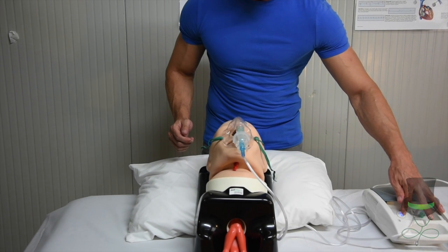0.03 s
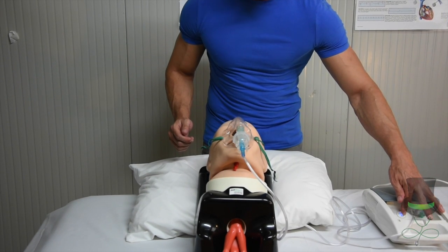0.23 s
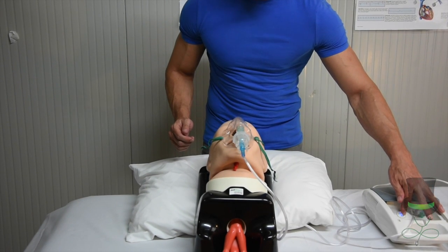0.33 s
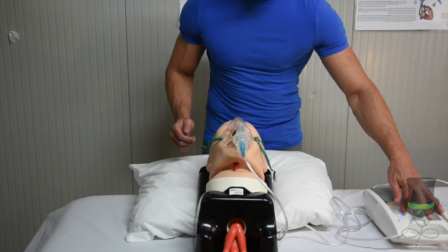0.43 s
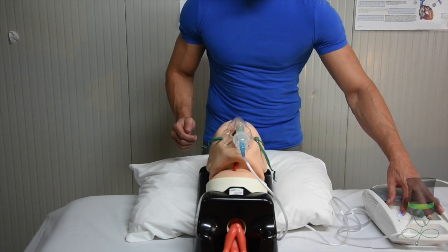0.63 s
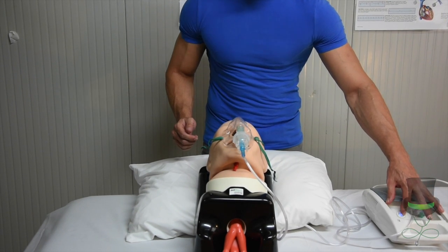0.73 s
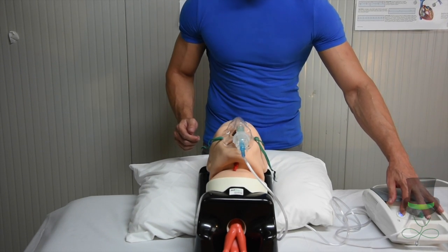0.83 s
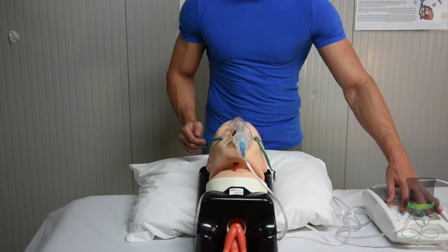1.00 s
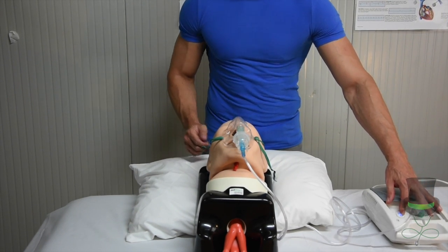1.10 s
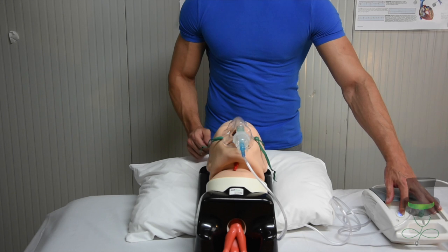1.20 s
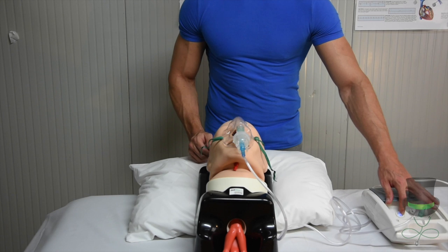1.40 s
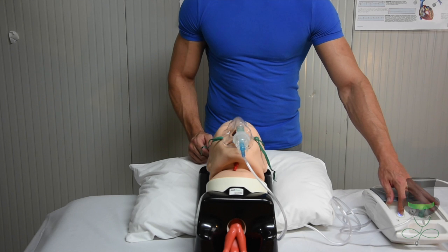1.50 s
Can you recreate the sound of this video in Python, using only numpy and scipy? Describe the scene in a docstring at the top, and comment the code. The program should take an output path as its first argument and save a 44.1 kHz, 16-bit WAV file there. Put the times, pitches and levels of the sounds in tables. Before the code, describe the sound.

A small air compressor starts up in a quiet room after the snap of a plastic switch. It knocks rapidly and rattles loosely, then steadies into a throbbing hum, while a hiss of air briefly whistles and grows brighter.

```python
"""A nebuliser's small piston compressor is switched on in a quiet room.
First the plastic rocker switch scrapes over and snaps, and a faint hum fades away. The piston then
knocks and throbs once a turn in its housing, rattling loosely at first, with a few thumps and bumps.
Air starts to hiss through the nozzle and briefly whistles. As the rattle settles and pressure builds,
the hiss brightens, and thin wavering tones and a valve tick come up."""
import sys
import numpy as np
from scipy import signal
from scipy.fft import rfft, irfft
from scipy.io import wavfile
from scipy.ndimage import uniform_filter1d

SR = 44100
rng = np.random.default_rng(int(sys.argv[2]) if len(sys.argv) > 2 else 0)


def waveform_to_disk(signal):
    """Save audio, clipped to [-1, 1], as 16-bit WAV at the path in sys.argv[1]."""
    frames = np.transpose(np.atleast_2d(signal))
    scaled = np.clip(frames, -1, 1) * 32767
    samples = np.round(scaled).astype(np.int16)
    wavfile.write(sys.argv[1], SR, samples)


N = 68355
T = np.arange(N) / SR
TURN_HZ, FIRST_KNOCK_S = 45.43, .2303
PUMP_PAN_DB, AIR_PAN_DB, SWITCH_PAN_DB = -3.5, -3, -1.2  # left against right


# Fader moves of the pump, before trims (time [s], knock [dB], throb [dB], body [dB])
PUMP_FADERS = [(0, -110, -110, -110), (.22, -85, -75, -86.5), (.245, -62.5, -72.5, -105),
               (.3, -63, -99, -78), (.328, -52, -64, -68), (.36, -45.5, -62, -61), (.39, -46, -65.5, -67),
               (.488, -55, -83, -63.5), (.494, -45, -73, -60.5), (.58, -46.5, -58.5, -60),
               (.65, -49, -53, -59.5), (.725, -45, -50, -55.5), (.79, -48, -54, -56.5),
               (.825, -45.5, -54, -60.5), (.87, -45.5, -52, -58), (.99, -46.5, -56.5, -60),
               (1.09, -47.5, -50, -59), (1.17, -48, -55, -60.5), (1.36, -48.5, -47, -58.5),
               (1.44, -48, -49, -57), (1.55, -48.5, -48.5, -61)]

def pump(knock_trim_db=-.5, throb_trim_db=.5, body_trim_db=4, tick_db=-74):
    """The compressor: knock, throb and body drone, with a valve tick that grows with the pressure."""
    knock = piston_knock() * amp(knock_trim_db + curve(PUMP_FADERS, 1))
    throb = chamber_throb() * amp(throb_trim_db + curve(PUMP_FADERS, 2))
    drone = body_drone() * amp(body_trim_db + curve(PUMP_FADERS, 3))
    tick = valve_tick() * amp(tick_db) * pressure()
    return place(knock + throb + drone + tick, PUMP_PAN_DB)


# Knocks that land harder or softer than the rest (time [s], gain [dB])
ACCENTS = [(.494, 1.5), (.539, -0.5), (.803, 2), (.825, 3.5), (.891, -2), (1.133, 1)]

def piston_knock(rattle_db=-4, settle_s=.65, settle_db_per_s=13, grit=.5):
    """The piston strikes the housing once a turn; a loose rattle between the blows slowly settles."""
    looseness = amp(rattle_db - settle_db_per_s * since(settle_s))
    return_stroke = strokes(.5, scatter_db=2, jitter_s=.0002)
    chatter = strokes(.33, scatter_db=3, jitter_s=.0004)
    rattle = unit(return_stroke + .6 * chatter + grit * noise())
    accent = amp(sum(db * (np.abs(T - at) < .5 / TURN_HZ) for at, db in ACCENTS))
    blows = accent * strokes(0, scatter_db=0, jitter_s=.00003)
    return housing(blows + looseness * rattle)


# Resonances of the housing (frequency [Hz], gain [dB])
HOUSING_EQ = [(100, -70), (600, -54.5), (700, -42), (772, -7.5), (818, -18), (863, -16.5), (940, -30),
              (1045, -8), (1090, -12), (1136, 0), (1181, 3.5), (1227, -6), (1272, 5), (1317, 2),
              (1363, -44), (1408, -10), (1550, -25), (2000, -61)]
# How late the housing answers (frequency [Hz], delay [s])
HOUSING_DELAY = [(1195, .0008), (1245, .0072)]

def housing(blows):
    """The housing colours each blow; its upper mode answers later, so a knock chirps."""
    hz = np.fft.rfftfreq(2 * N, 1 / SR)
    lag = np.exp(-2j * np.pi * np.cumsum(over_hz(HOUSING_DELAY, hz)) * hz[1])
    return unit(irfft(rfft(blows, 2 * N) * amp(over_hz(HOUSING_EQ, hz)) * lag)[:N])


# Hollow resonance of the air chamber (frequency [Hz], gain [dB])
CHAMBER_EQ = [(100, -69.5), (300, -49.5), (410, -28), (455, -11.5), (500, -9), (545, 1.5), (590, -5.5),
              (636, -19.5), (800, -45.5)]

def chamber_throb():
    """Each stroke pushes on the air chamber just over half a turn after the knock."""
    push = strokes(.55, scatter_db=1.5, jitter_s=.00004) + .25 * noise()
    return ring(push, CHAMBER_EQ)


# Low, broad resonances of the pump body (frequency [Hz], gain [dB])
BODY_EQ = [(25, -39.5), (40, -25), (75, -33), (95, -1), (135, -8.5), (180, -4.5), (205, -7), (272, -2),
           (318, 1.5), (400, -6.5), (700, -4.5), (1000, -1.5), (1600, -12), (3000, -46.5)]

def body_drone():
    """The strokes shake the body into a rough, noisy hum."""
    return ring(strokes(.55, scatter_db=.5, jitter_s=.0001) + 1.73 * noise(), BODY_EQ)


def valve_tick(turn=.4, decay_s=.003):
    """The valve lets out one short, bright tick a turn."""
    since_tick = ((T - FIRST_KNOCK_S) * TURN_HZ - turn) % 1 / TURN_HZ
    burst = noise() * np.exp(-since_tick / decay_s)
    return ring(burst, [(1200, -41), (3100, -2), (4200, 0), (9000, 0)])


# Cues for the heavier strokes (time [s], level [dB])
THUMP_CUES = [(0.362, -43), (0.651, -43.5), (0.712, -47), (0.868, -43.5), (1.26, -44.5), (1.399, -43)]

def chamber_thumps(hz=536.5, half_width_s=.0059):
    """Now and then a heavier stroke makes the air chamber boom."""
    envelope = sum(amp(db) * swell(at, half_width_s) for at, db in THUMP_CUES)
    return place(envelope * np.sqrt(2) * sine(hz), PUMP_PAN_DB)


# Cues for the casing bumps (time [s], pitch [Hz], level [dB])
BUMP_CUES = [(.51, 170, -61.5), (.703, 110, -60.5), (.805, 100, -60)]

def casing_bumps(half_width_s=.02):
    """The casing settles with soft, dull bumps."""
    bumps = sum(amp(db) * swell(at, half_width_s) * np.sqrt(2) * sine(hz) for at, hz, db in BUMP_CUES)
    return place(bumps, PUMP_PAN_DB)


# Thin tones in the jet (pitch [Hz], bandwidth [Hz], level against the hiss [dB])
JET_PARTIALS = [(2285, 41, -9), (2843, 42, -12), (3106, 90, -11.5), (4320, 70, -39), (5220, 27, -14.5),
                (7450, 40, -13), (9140, 90, -17), (11520, 140, -13), (13720, 26, -9), (14200, 70, -13)]

def jet_tones(waver_db=4, waver_hz=22):
    """Narrow tones waver in the jet and grow with the pressure."""
    tones = sum(narrow(hz, width) * amp(db + waver_db * walk(waver_hz)) for hz, width, db in JET_PARTIALS)
    return tones * pressure()


# Colour of the nozzle hiss (frequency [Hz], gain [dB])
HISS_EQ = [(1000, -9), (1600, -2), (2050, -3), (2500, -0.5), (3100, 4.5), (3800, -2.5), (4300, 2),
           (4750, -5.5), (5500, 1.5), (6600, -8), (7300, 0), (7900, -3.5), (8400, -9), (9100, 9),
           (9800, -5.5), (10600, -1), (11100, -5.5), (11500, -14), (12300, -3), (13200, -13.5),
           (13800, 1.5), (14600, -2), (15000, -2), (15700, -4), (16000, -10)]
# Sharp peak of the whistle (frequency [Hz], gain [dB])
WHISTLE_EQ = [(7000, -45), (8100, -23), (8260, 8), (8330, 6.5), (8420, -13.5), (8600, -15), (10000, -62.5)]
# Air faders (time [s], hiss before trim [dB], tilt about 4 kHz [dB/octave], whistle [dB])
AIR_FADERS = [(0, -110, -0.5, -110), (.25, -74.5, -9, -96), (.31, -68, -11.5, -78.5),
              (.37, -55, -7.5, -75.5), (.44, -55.5, -4.5, -62.5), (.475, -55, -3.5, -60.5),
              (.52, -52.5, -3, -50), (.56, -52, -1.5, -53), (.67, -52, 0, -67), (.7, -52.5, 1, -44),
              (.73, -51, -2, -47.5), (.79, -54, 0.5, -62.5), (1.1, -56.5, 2.5, -60.5),
              (1.35, -55.5, -0.5, -67), (1.55, -58.5, 2.5, -64.5)]

def nozzle(hiss_trim_db=-2.5, low_spread=.14, high_spread=.79, whistle_spread=.25):
    """Air hisses through the nozzle, brightening and widest in the treble; a whistle comes and goes."""
    centres = 1000. * 2 ** np.arange(5)
    tilt_db = np.outer(np.log2(centres / 4000), curve(AIR_FADERS, 2))
    band_gains = amp(hiss_trim_db + curve(AIR_FADERS, 1) + tilt_db)
    def hiss():
        jet = jet_tones() + reflections(ring(noise(), HISS_EQ))
        return bands(jet, centres) * band_gains
    def whistle():
        return ring(noise(), WHISTLE_EQ) * amp(curve(AIR_FADERS, 3))
    spread = np.linspace(low_spread, high_spread, len(centres))
    mid = hiss().sum(axis=0) + whistle()
    side = spread ** 2 @ hiss() + whistle_spread * whistle()
    return place(mid, AIR_PAN_DB, side)


# Cues for the squeaks (time [s], pitch [Hz], level [dB])
SQUEAK_CUES = [(.39, 2840, -60), (.432, 4450, -57.5), (0.442, 2800, -54), (.587, 5240, -61),
               (1.02, 2280, -64.5), (1.14, 2236, -62), (1.335, 3170, -60), (1.5, 5200, -63)]

def jet_squeaks(half_width_s=.016, width_hz=120):
    """The jet catches on a tone for a moment."""
    squeaks = sum(narrow(hz, width_hz) * amp(db) * swell(at, half_width_s) for at, hz, db in SQUEAK_CUES)
    return place(squeaks, AIR_PAN_DB)


# Colour of the scraping plastic (frequency [Hz], gain [dB])
PLASTIC_EQ = [(200, -55.5), (600, -47), (950, -32.5), (1300, -41.5), (1650, -22.5), (2000, -8.5),
              (2500, -8), (2850, -0.5), (3400, -4), (4050, -0.5), (4600, -5), (5500, -8.5), (7000, -8),
              (8000, -8), (8600, -19.5), (9050, -22), (9800, -9), (11500, -16), (13000, -24), (14300, -20),
              (16000, -51)]
# Ring-out of the switch (frequency [Hz], time to fall 60 dB [s])
SWITCH_DECAY = [(1000, .25), (2000, 0.21), (3000, 0.52), (4200, 0.3), (6000, 0.18), (8000, 0.24),
                (11000, 0.15), (15000, 0.09)]
# Ringing modes of the switch housing (pitch [Hz], peak level before trim [dB])
SWITCH_PARTIALS = [(2762, -37.5), (2966, -42.5), (3063, -33), (3300, -50), (3865, -44), (4065, -33),
                   (4527, -36), (5679, -37.5), (7111, -37), (7560, -34.5), (9878, -45)]

def rocker_switch(press_s=.1035, snap_s=.133, mute_s=.19, scrape_db=-21, snap_db=-28, ring_trim_db=-.5):
    """A gritty plastic scrape swells to a snap, rings in the housing and is damped by the finger."""
    onset_db_per_s, press_db_per_s, mute_db_per_s = 4497.5, 392, 267
    attack_db = -onset_db_per_s * np.maximum(press_s - T, 0) - press_db_per_s * np.maximum(snap_s - T, 0)
    finger = amp(attack_db - mute_db_per_s * since(mute_s))
    snap = amp(snap_db) * swell(snap_s, half_width_s=.0015)
    centres, t60s = np.array(SWITCH_DECAY).T
    def envelope(t60):
        return finger * amp(-60 * since(snap_s) / t60)
    def scrape(grain_db=2):
        grit = noise() * amp(grain_db * unit(uniform_filter1d(noise(), size=40)))
        band_gains = np.array([snap + amp(scrape_db) * envelope(t60) for t60 in t60s])
        return bands(ring(grit, PLASTIC_EQ), centres) * band_gains
    modes = sum(envelope(over_hz(SWITCH_DECAY, hz)) * amp(db + ring_trim_db) * sine(hz)
                for hz, db in SWITCH_PARTIALS)
    spread = over_hz([(4000, .2), (11000, .65)], centres)  # wider in the treble
    return place(scrape().sum(axis=0) + modes, SWITCH_PAN_DB, spread @ scrape())


def reflections(dry, wet_db=2, t60_s=.13):
    """Short reflections from the table and the near wall comb the treble."""
    t = T[:SR // 10]
    echoes = rng.standard_normal(len(t)) * amp(-60 * t / t60_s)
    wet = signal.fftconvolve(dry, echoes / np.linalg.norm(echoes))[:N]
    return unit(dry + amp(wet_db) * wet)


# Dark colour of the room tone (frequency [Hz], gain [dB])
ROOM_EQ = [(25, -16.5), (80, -12), (130, 7.5), (220, 4), (340, -14.5), (500, -29), (16000, -50)]

def room_tone(noise_db=-80.5, hum_hz=122, hum_db=-74.5, fade_s=.16, fade_db_per_s=150):
    """Low room noise, with a faint hum that fades just after the snap."""
    hum = amp(hum_db - fade_db_per_s * since(fade_s)) * np.sqrt(2) * np.sin(2 * np.pi * hum_hz * T)
    return place(ring(noise(), ROOM_EQ) * amp(noise_db) + hum, PUMP_PAN_DB)


def strokes(turn, scatter_db, jitter_s):
    """One pulse a turn at the given share of the turn, each a little uneven."""
    count = np.arange(int(N / SR * TURN_HZ))
    timing, force = rng.standard_normal((len(count), 2)).T
    times = FIRST_KNOCK_S + (count + turn) / TURN_HZ + jitter_s * timing
    return unit(np.bincount((times * SR).astype(int), amp(scatter_db * force), N)[:N])


def pressure(start_s=.37, rise_s=.91):
    """Air pressure, 0-1, building up once the pump runs."""
    return np.clip((T - start_s) / rise_s, 0, 1)


def ring(x, eq, size=16384):
    """Pass x through a causal resonator with the given response; rms 1."""
    cepstrum = irfft(np.log(amp(over_hz(eq, np.fft.rfftfreq(size, 1 / SR)))))
    cepstrum[1:size // 2] *= 2  # fold to minimum phase: the ring follows the hit
    cepstrum[size // 2 + 1:] = 0
    impulse = irfft(np.exp(rfft(cepstrum)))[:size // 2]
    return unit(signal.fftconvolve(x, impulse)[:N])


def bands(x, centres):
    """Split x into overlapping bands that add up to x."""
    hz, spectrum = np.fft.rfftfreq(2 * N, 1 / SR), rfft(x, 2 * N)
    return np.array([irfft(spectrum * np.interp(hz, centres, row))[:N] for row in np.eye(len(centres))])


def narrow(hz, width_hz):
    """Noise in one narrow resonance."""
    pole = np.exp((2j * np.pi * hz - np.pi * width_hz) / SR)
    return unit(signal.lfilter([1], [1, -pole], noise()).imag)


def walk(rate_hz):
    """Slow random drift; rms 1."""
    hold = int(SR / rate_hz)
    steps = np.repeat(rng.standard_normal(N // hold + 1), hold)
    return unit(uniform_filter1d(steps, hold)[:N])


def noise():
    """White noise."""
    return rng.standard_normal(N)


def sine(hz):
    """A sine with a random phase."""
    return np.sin(2 * np.pi * (hz * T + rng.random()))


def swell(at_s, half_width_s):
    """Bell-shaped envelope with peak 1."""
    return np.exp(-((T - at_s) / half_width_s) ** 2)


def since(at_s):
    """Seconds after a cue, 0 before it."""
    return np.maximum(T - at_s, 0)


def curve(table, column):
    """One column of a time table, joined by straight lines."""
    table = np.array(table)
    return np.interp(T, table[:, 0], table[:, column])


def over_hz(table, hz):
    """Read (frequency, value) points on a log-frequency axis."""
    points_hz, values = np.array(table).T
    return np.interp(np.log(np.maximum(hz, 1)), np.log(points_hz), values)


def amp(db):
    """Decibels to gain."""
    return 10 ** (np.asarray(db) / 20)


def unit(x):
    """Scale to rms 1."""
    return x / np.sqrt(np.mean(x ** 2))


def place(mid, pan_db, side=0):
    """Left and right from a centre signal and a diffuse one."""
    return np.array([(mid + side) * amp(pan_db / 2), (mid - side) * amp(-pan_db / 2)])


def scene():
    """Switch, pump and nozzle in the quiet room."""
    machine = rocker_switch() + pump() + chamber_thumps() + casing_bumps()
    return machine + nozzle() + jet_squeaks() + room_tone()


def record(dry):
    """A steep high cut at 16 kHz."""
    return signal.sosfilt(signal.ellip(10, .2, 80, 16000, fs=SR, output="sos"), dry)


dry = scene()
out = record(dry)
waveform_to_disk(out)
```